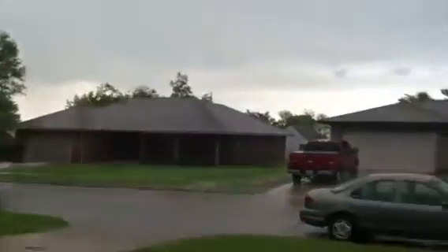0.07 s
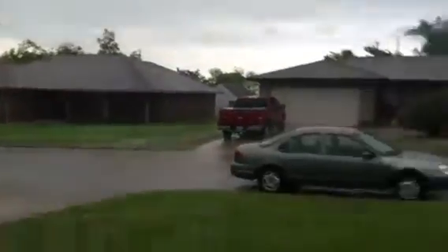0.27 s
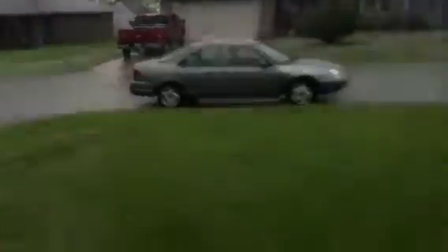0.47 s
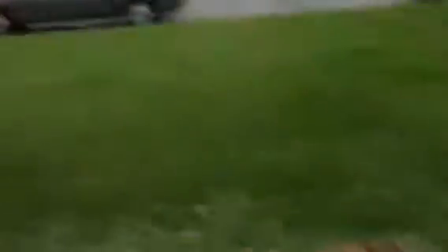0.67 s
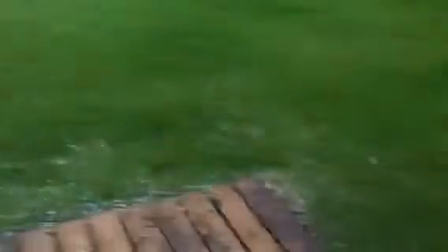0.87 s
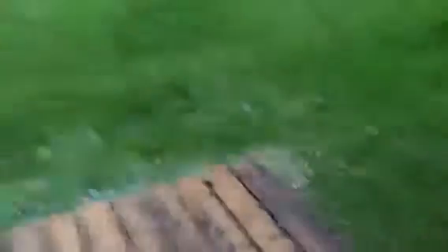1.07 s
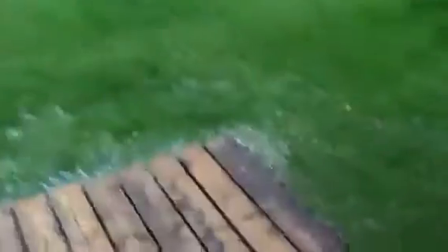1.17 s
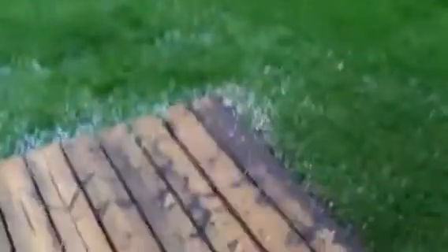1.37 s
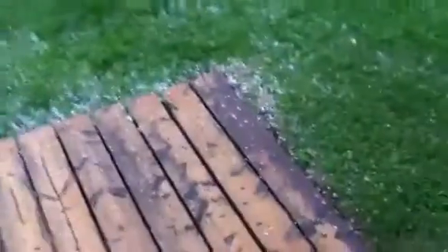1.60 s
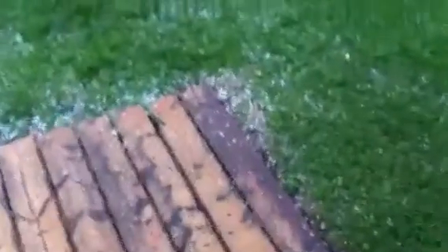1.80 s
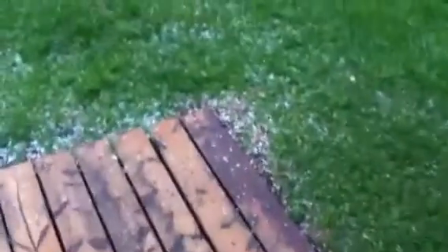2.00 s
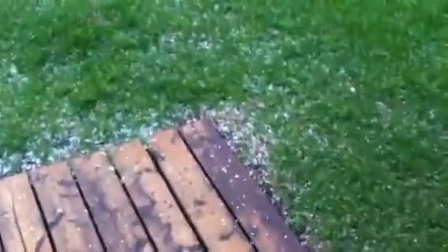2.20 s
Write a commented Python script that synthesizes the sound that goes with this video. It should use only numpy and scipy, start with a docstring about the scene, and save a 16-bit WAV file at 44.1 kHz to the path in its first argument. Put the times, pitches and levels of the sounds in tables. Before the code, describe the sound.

Hissing rain with hailstones ticking on wooden boards over a low wind rumble.

```python
"""Rain and hail on a deck

Rain and hail fall on a lawn and a wooden deck, heard from a porch through a hand-held microphone.
Covered at first, it hears only a dull murmur, then comes clear with a thump. Dense drop impacts merge
into a hiss, hailstones tick and set the boards ringing, and a low rumble of wind swells in gusts."""
import sys
import numpy as np
from scipy import signal
from scipy.fft import rfft, irfft
from scipy.io import wavfile
from scipy.ndimage import uniform_filter1d

SR = 44100
rng = np.random.default_rng(int(sys.argv[2]) if len(sys.argv) > 2 else 0)


def int16_out(signal):
    """Quantize to a 16-bit WAV file."""
    q = np.round(np.clip(np.atleast_2d(signal).T, -1, 1) * 32767)
    wavfile.write(sys.argv[1], SR, q.astype(np.int16))


N = 99225
HAIL_TOP_HZ = 7140
# big hailstones: t/s, click level/dB, click f/Hz, ring re click/dB, splash level/dB, tilt/(dB/octave)
BIG_STONES = [(0.2739, -29, 1500, -19, -40, -1), (0.2787, -29, 2000, -14, -47, -2),
              (0.454, -39, 2700, -14, -41.5, 1), (.477, -35, 1500, -11, -45, -2),
              (.487, -30.5, 1970, -11, -43, -1), (0.649, -34, 3980, -16, -39.5, 2),
              (.684, -36, 1160, -12, -51, -5), (.822, -41, 3500, -14, -42.5, 3),
              (1.046, -26.5, 1530, -18, -54, 0), (1.067, -33, 6200, -14, -42, 3),
              (1.0925, -10, 2900, -22, -44, 4), (1.0995, -21, 2130, -15, -44, -11),
              (1.2272, -32, 2180, -16, -52, -3), (1.2466, -26.5, 1470, -14, -40, -2),
              (1.3147, -27, 1950, -14, -43, 1), (1.434, -35, 1080, 1, -44, -2),
              (1.4506, -31, 1780, -11, -42, -3), (1.4686, -31, 1800, -12, -38, 3),
              (1.527, -29.5, 1500, -4, -37.5, 0), (1.601, -22, 1760, -13, -34.5, 4),
              (1.652, -33, 1060, -2, -45, -2), (1.6698, -26, 2000, -11, -42, 0),
              (1.696, -27, 1400, -14, -35, -1), (1.708, -32.5, 1090, -2, -47, -3),
              (1.736, -28.5, 2000, -11, -46, 2), (1.861, -30, 3100, -14, -37, 1),
              (1.8705, -25, 1610, -8, -34.5, 1), (1.948, -28.5, 2300, -11, -34, 0),
              (1.9836, -22, 2670, -14, -34, 1.5), (2.0593, -30, 1700, -16, -40, 2),
              (2.144, -29, 2300, -13, -38, -1), (2.191, -22.5, 3860, -11, -37, 2),
              (2.242, -24.5, 2050, -14, -34.5, 1)]


def rain(drops_per_s=3500, flutter_per_s=30, flicker_db=0.7, flurry_db=0.54, octaves=7):
    """Shot noise: near drops click over the Gaussian wash of far ones, in flurries; each octave flickers."""
    # spectrum of the drops: f/Hz, level/dB
    drop_spectrum = [(40, -49), (100, -17), (170, -8), (300, -2.5), (730, -2), (1050, -2.5), (1280, -4),
                     (1950, -0.5), (2600, -1.5), (2950, -3.5), (3600, -4), (4450, -2.5), (4950, -10),
                     (6000, -9), (7400, -13), (9000, -18.5), (11300, -27.5), (13400, -29), (15000, -49)]
    falls = rng.random(N) < drops_per_s / SR
    size_db = 0.5 * np.minimum(rng.exponential(size=N), 4)
    near = unit(falls * undb(size_db) * rng.choice([-1, 1], N))
    far = rng.standard_normal(N)
    spectrum = rfft(colour(near + far, drop_spectrum))
    octave = np.clip(np.log2(np.linspace(1, SR / 2, len(spectrum)) / 250), 0, octaves - 1)
    bands = [irfft(spectrum * np.maximum(1 - abs(octave - k), 0), N) for k in range(octaves)]
    hiss = sum(band * undb(flicker_db * walk(flutter_per_s)) for band in bands)
    return unit(hiss) * undb(flurry_db * walk(flutter_per_s))


def spatter(clumps_per_s=80, decay_s=0.0058):
    """Poisson clustering: drops land in clumps, each a jump in the rain's gain that dies away."""
    t = np.arange(SR // 10) / SR
    clumps = (rng.random(N) < clumps_per_s / SR) * rng.random(N)
    surges = signal.fftconvolve(clumps, np.exp(-t / decay_s))[:N]
    return unit(1 + undb(-5.5) * surges)


def stones(attack_s=0.00041, decay_s=0.00071, glide=0.34, ring_octaves=0.81):
    """Modal resonance: a big hailstone clicks and excites the board modes that lie near its pitch."""
    # modes of the boards: f/Hz, level/dB, T60/s
    board_modes = [(1086, -3.5, 0.048), (1206, -9, 0.039), (1850, -9, 0.031), (1913, -9.5, 0.048),
                   (2250, -0.5, 0.069), (2560, -30, .03), (3020, -21, 0.027), (4000, 0, 0.02),
                   (4400, -7, 0.021)]
    out, t = np.zeros(N), np.arange(SR // 10) / SR
    mode_hz, mode_db, t60 = np.array(board_modes).T[:, :, None]
    decay = np.exp(-t / decay_s)
    contact = (1 - np.exp(-(t / attack_s) ** 2)) * decay
    for start, db, hz, ring_db, _, _ in BIG_STONES:
        detune, strength = rng.standard_normal((2, len(board_modes), 1))
        falling_hz = hz * (1 + glide * (decay - .5))
        click = contact / contact.max() * np.sin(2 * np.pi * np.cumsum(falling_hz) / SR)
        nearness = np.exp(-.5 * (np.log2(mode_hz / hz) / ring_octaves) ** 2)
        modes = np.sin(2 * np.pi * mode_hz * (1 + 0.01 * detune) * t) * np.exp(-np.log(1000) * t / t60)
        ring = (undb(mode_db + 1.5 * strength) * nearness * modes).sum(axis=0)
        add(out, start, undb(db) * (click + undb(ring_db) * ring))
    return porch(lowpass(out, HAIL_TOP_HZ))


def splashes(attack_s=0.0013, decay_s=0.02, pivot_hz=2500, low_hz=800):
    """Spectral tilt: a big stone's spray is dull where it is mostly water, bright where ice shatters."""
    out, t = np.zeros(N), np.arange(SR // 5) / SR
    drops = lowpass(rain(), hz=10000, order=2)
    hz = np.maximum(np.fft.rfftfreq(len(t), 1 / SR), 1)
    bass_cut = np.minimum(hz / low_hz, 1) ** 2
    envelope = (1 - np.exp(-t / attack_s)) * np.exp(-t / decay_s)
    for start, _, _, _, db, tilt_db in BIG_STONES:
        i = rng.integers(N - len(t))
        tilt = undb(tilt_db * np.log2(hz / pivot_hz))
        spray = unit(irfft(rfft(drops[i:i + len(t)]) * tilt * bass_cut, len(t)))
        add(out, start, undb(db) * spray * envelope)
    return out


def pellets(per_s=200, low_hz=962, high_hz=7620, mean_decay_cycles=3.2):
    """Damped oscillation: each small hailstone ticks for a few cycles at a pitch of its own."""
    out, t = np.zeros(N), np.arange(SR // 40) / SR
    for when, pitch, weight, sustain in rng.random((int(per_s * N / SR), 4)):
        hz = low_hz * (high_hz / low_hz) ** pitch
        size_db = 2 * min(-np.log(1 - weight), 3.5)
        tilt_db = 2 * np.log2(hz / low_hz)
        decay_s = mean_decay_cycles * (.5 + sustain) / hz
        tick = np.sin(2 * np.pi * hz * t) * np.exp(-t / decay_s)
        add(out, when * N / SR, undb(size_db + tilt_db) * tick)
    return undb(-11.5) * unit(porch(lowpass(out, HAIL_TOP_HZ)))


def thump(start_hz=520, end_hz=126, sag_s=0.0025, attack_s=0.00084, decay_s=0.004, choke_s=.015):
    """Impulse response: the cover leaves the microphone with a snap, a puff and a slowing pressure swing."""
    # knocks of the cover, a nudge and then the release: t/s, level/dB
    knocks = [(0.2139, -22.5), (0.2186, -1.5)]
    # spectrum of the snap: f/Hz, level/dB
    snap_spectrum = [(200, 5), (750, 8.5), (1000, 7.5), (1200, 1.5), (1550, 4.5), (2000, -9), (2700, 1.5),
                     (3600, -13), (5500, -21), (8000, -41), (14000, -60)]
    pushes, t = np.zeros(N), np.arange(SR // 10) / SR
    for start, db in knocks:
        add(pushes, start, -undb([db]))
    hz = end_hz + (start_hz - end_hz) * np.exp(-t / sag_s)
    envelope = (1 - np.exp(-t / attack_s)) * np.exp(-t / decay_s - (t / choke_s) ** 2)
    swing = np.sin(2 * np.pi * np.cumsum(hz) / SR) * envelope
    puff_s = 0.00085
    puff = t / puff_s * np.exp(1 - t / puff_s)
    body = signal.fftconvolve(pushes, undb(3.5) * swing + undb(-22) * puff)[:N]
    rounded = signal.sosfiltfilt(signal.butter(4, 685, fs=SR, output="sos"), body)
    return rounded + undb(3.5) * colour(pushes, snap_spectrum)


def wind(buffet_s=0.0034):
    """Amplitude-modulated noise: a rumble follows the gusts, with deep bass and a few short buffets."""
    # strength of the gusts: t/s, level/dB
    gusts = [(.22, -49), (.4, -52.5), (.5, -46), (.55, -41.5), (.7, -43), (.745, -34), (.79, -40),
             (.84, -33), (1.1, -34.5), (1.17, -31.5), (1.29, -34.7), (1.38, -30), (1.45, -34.5),
             (1.56, -37), (1.65, -39.5), (1.73, -34), (1.8, -37), (1.89, -35), (1.97, -41.5), (2.03, -39),
             (2.25, -40.5)]
    # spectrum of the rumble: f/Hz, level/dB
    rumble_spectrum = [(20, -42), (50, -34), (90, -22), (130, -17.5), (160, 2), (250, 0), (340, 1.5),
                       (400, -6.5), (520, -12.5), (800, -19), (2000, -54.5)]
    # swell of the deep bass: t/s, level/dB
    bass_swell = [(.22, -59), (.7, -65), (.9, -48), (1.05, -60), (1.2, -48), (1.45, -52), (1.55, -40.5),
                  (1.9, -46.5), (1.97, -51.5), (2.25, -51)]
    # spectrum of the deep bass: f/Hz, level/dB
    bass_spectrum = [(20, -39), (38, -38), (60, -14), (90, -2), (125, 2), (180, 0), (400, -49)]
    # strongest buffets: t/s, level/dB, f/Hz
    buffets = [(1.173, -27, 204), (1.316, -26, 300), (1.361, -20.5, 189), (1.599, -22.5, 284),
               (1.725, -26.5, 230), (2.2, -29, 290)]
    t = np.arange(N) / SR
    rumble = noise(rumble_spectrum) * curve(gusts) * undb(0.5 * walk(per_s=30))
    out = rumble + noise(bass_spectrum) * curve(bass_swell)
    for when, db, hz in buffets:
        envelope = np.exp(-.5 * ((t - when) / buffet_s) ** 2)
        out += undb(db) * envelope * np.cos(2 * np.pi * hz * (t - when))
    return out


def murmur():
    """Masking: a faint, dull noise runs throughout, heard only while the microphone is covered."""
    # spectrum of the murmur: f/Hz, level/dB
    murmur_spectrum = [(25, -42), (70, -12), (150, -1), (260, -5.5), (450, -14), (1200, -22), (2100, -32),
                       (5000, -45), (14000, -55)]
    return undb(-59) * noise(murmur_spectrum)


def porch(x, t60_s=0.056, build_s=0.00083, reflected_db=-5):
    """Reverberation: quick, dense reflections from the wall, eaves and boards follow the direct sound."""
    t = np.arange(SR // 5) / SR
    tail = rng.standard_normal(len(t)) * np.exp(-np.log(1000) * t / t60_s) * (1 - np.exp(-t / build_s))
    return x + undb(reflected_db) * signal.fftconvolve(x, tail / np.linalg.norm(tail))[:N]


def undb(db):
    """Amplitude ratio of a level in decibels."""
    return 10 ** (np.asarray(db) / 20)


def unit(x):
    """Normalisation to an rms of one."""
    return x / np.sqrt(np.mean(x ** 2))


def curve(rows):
    """Gain envelope interpolated through (t/s, level/dB) points."""
    return undb(np.interp(np.arange(N) / SR, *np.array(rows).T))


def walk(per_s):
    """Random modulation: per_s values a second, joined by ramps, with an rms of one."""
    hold = int(SR / per_s)
    steps = np.repeat(rng.standard_normal(N // hold + 1), hold)
    return unit(uniform_filter1d(steps, hold)[:N])


def colour(x, points, size=2048):
    """Minimum-phase filtering with a response through (f/Hz, level/dB) points."""
    hz, db = np.array(points).T
    bin_hz = np.arange(size // 2 + 1) * SR / size
    log_gain = np.log(undb(np.interp(np.log(bin_hz + 1), np.log(hz), db)))
    cepstrum = irfft(log_gain)
    cepstrum[1:size // 2] *= 2  # folding onto positive time makes the filter causal
    cepstrum[size // 2 + 1:] = 0
    return signal.fftconvolve(x, irfft(np.exp(rfft(cepstrum))))[:N]


def noise(spectrum):
    """Coloured Gaussian noise with an rms of one."""
    return unit(colour(rng.standard_normal(N), spectrum))


def lowpass(x, hz, order=4):
    """Butterworth roll-off of the treble above hz."""
    return signal.sosfilt(signal.butter(order, hz, fs=SR, output="sos"), x)


def add(out, start, sound):
    """Superposition of a sound from a start time in seconds."""
    i = min(int(start * SR), N)
    out[i:i + len(sound)] += sound[:N - i]


def scene(uncover_s=0.2156, rise_s=0.0047):
    """Superposition: the murmur, the thump and, once the cover is off, the open storm."""
    # strength of the downpour: t/s, level/dB
    downpour = [(.22, -46.5), (.3, -44.5), (.39, -46), (.48, -40.5), (.55, -40.5), (.78, -40.5),
                (.85, -38.5), (.93, -40), (1.06, -39), (1.22, -38.5), (1.27, -35), (1.4, -38),
                (1.46, -35.3), (1.585, -36.8), (1.7, -35.5), (1.8, -36), (1.97, -35), (2.07, -36),
                (2.25, -36.5)]
    clear = np.clip((np.arange(N) / SR - uncover_s) / rise_s, 0, 1)
    background = murmur()
    storm = wind() + stones() + splashes() + (rain() * spatter() + pellets()) * curve(downpour)
    return (background + thump() + clear * storm)[None]


def record(dry, top_hz=15300):
    """Band limiting: a steep elliptic low-pass cuts the highest treble."""
    return signal.sosfilt(signal.ellip(8, .2, 70, top_hz, fs=SR, output="sos"), dry)


dry = scene()
out = record(dry)
int16_out(out)
```